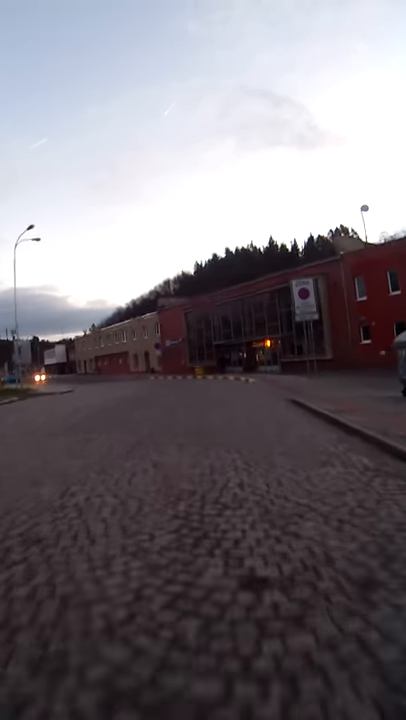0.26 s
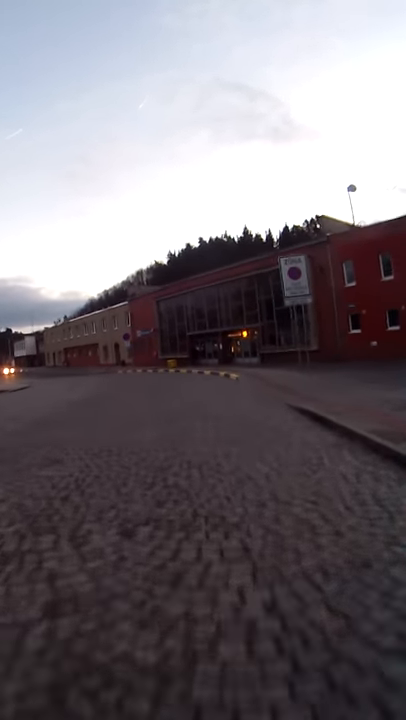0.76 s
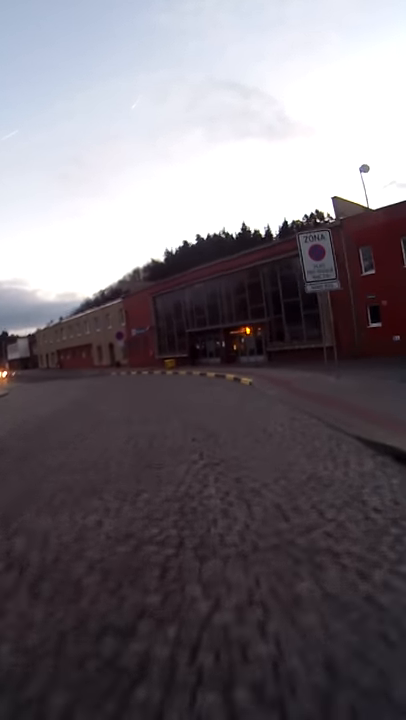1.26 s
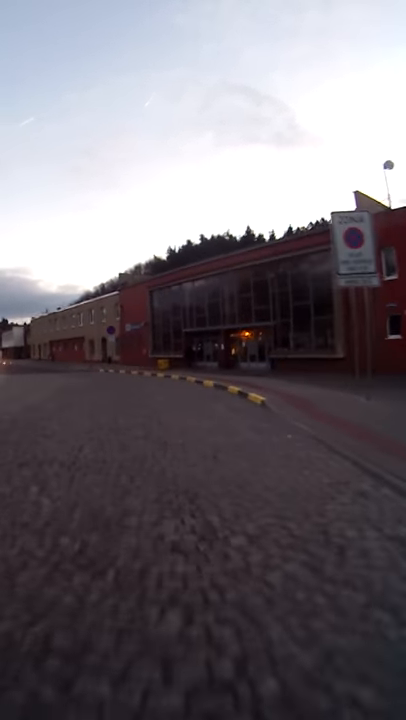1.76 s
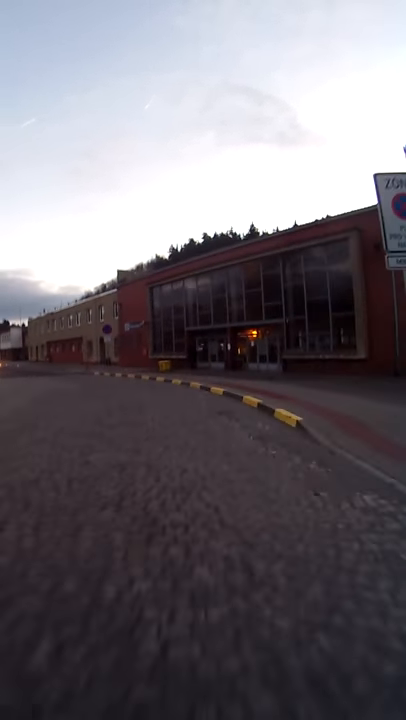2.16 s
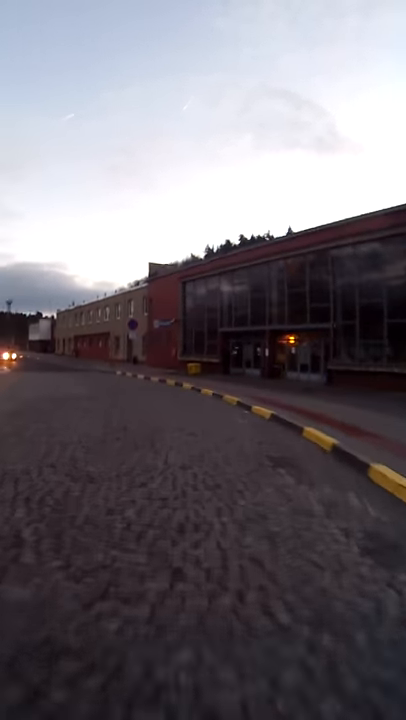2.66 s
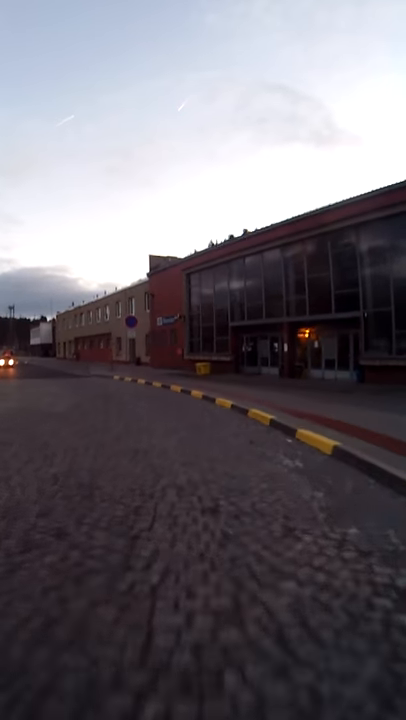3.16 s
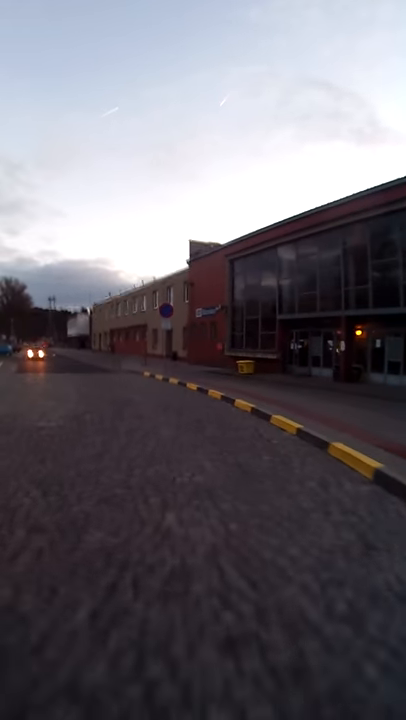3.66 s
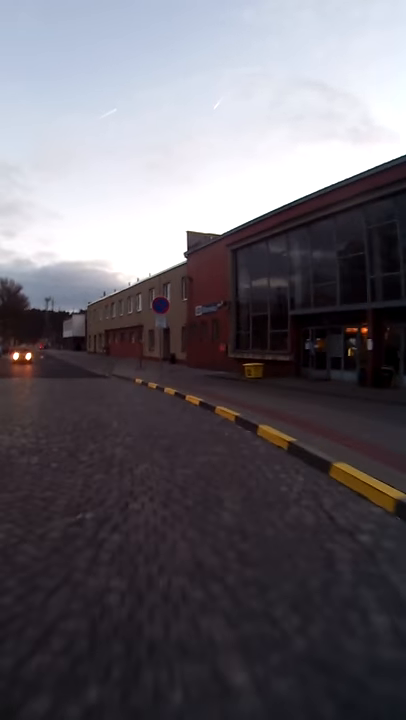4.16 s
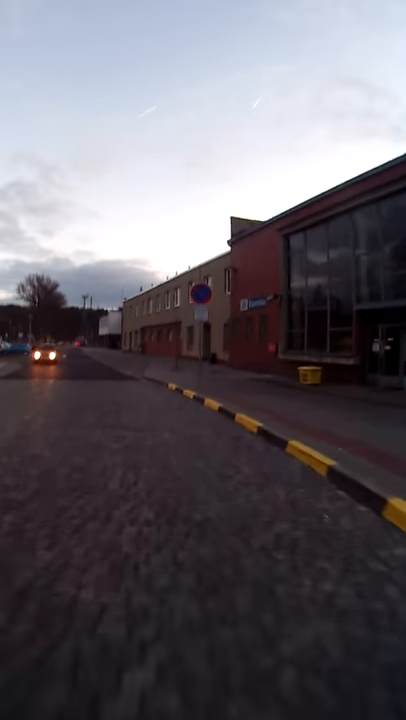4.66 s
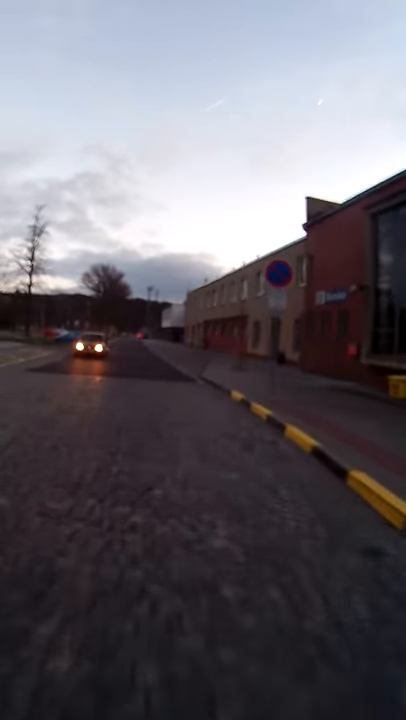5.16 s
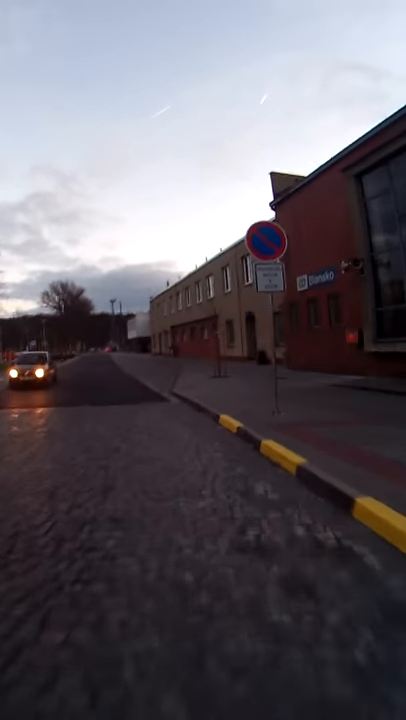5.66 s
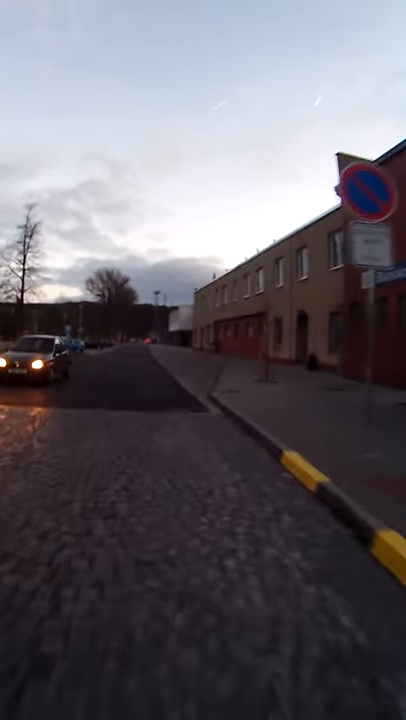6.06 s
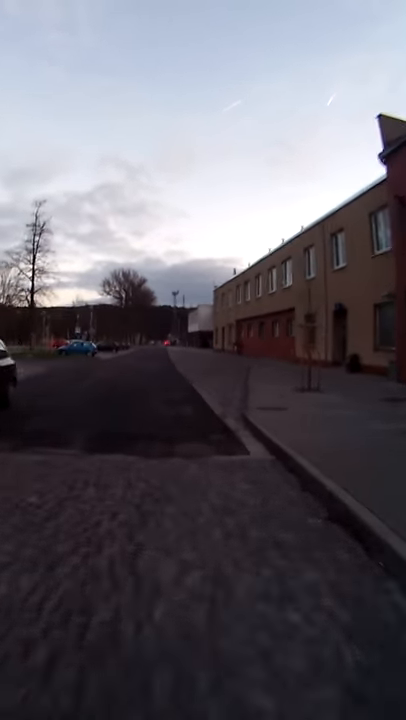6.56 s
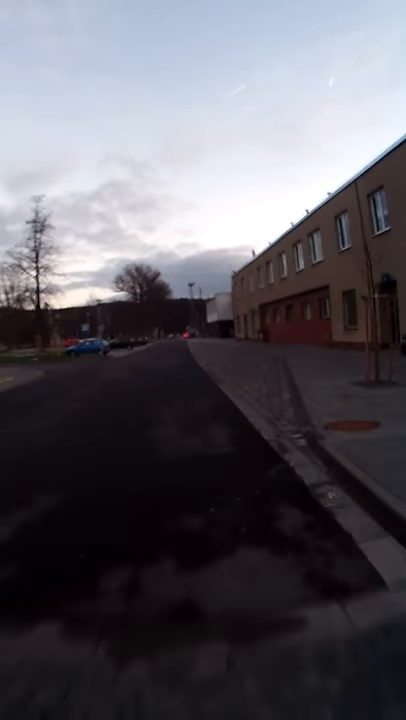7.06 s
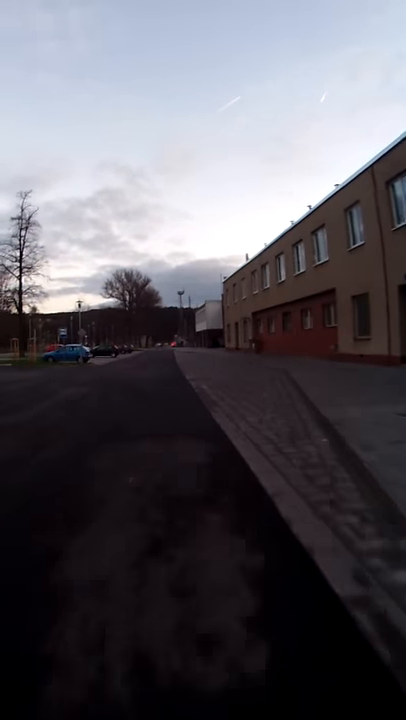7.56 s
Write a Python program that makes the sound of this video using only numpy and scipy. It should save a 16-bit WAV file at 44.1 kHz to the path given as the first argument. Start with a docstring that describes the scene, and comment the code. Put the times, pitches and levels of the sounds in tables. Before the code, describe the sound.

Close, mono, bike-mounted sound: fast uneven stone impacts merge into a low, shuddering drone with muffled treble. Grit crackles softly under the tyres. Isolated bright clacks from a loose fitting punch through, a few early, then clusters as the ride gets rougher, along with dull distorted knocks. Finally the bicycle rolls onto asphalt, the low thudding eases and the tread hums unsteadily, ending abruptly.

```python
"""Bicycle on cobblestones, then asphalt

A bicycle with a camera fixed to it rolls over cobbles and, in about the last half second, on to asphalt. Stone
impacts ring frame and camera housing; proud stones add big swings that overload the microphone. A loose part
clacks and ticks: short contacts through its modes, with dull knocks at its hardest blows. Grit hiss is noise in
spurts, one per stone; the tread hums, and on asphalt sings an unsteady note built of sine partials."""
import sys
import numpy as np
from scipy import signal
from scipy.fft import rfft, irfft
from scipy.io import wavfile
from scipy.ndimage import uniform_filter1d, minimum_filter1d, map_coordinates

SR = 44100
rng = np.random.default_rng(int(sys.argv[2]) if len(sys.argv) > 2 else 0)


def unload_wav(signal):
    """Save mono or channel-first audio to the path in sys.argv[1] as 16-bit WAV at rate SR, clipped to [-1, 1]."""
    wavfile.write(
        sys.argv[1],
        SR,
        np.round(np.clip(np.atleast_2d(signal).T, -1, 1) * 32767).astype(np.int16),
    )


N = 343891
TOP_HZ = 17100  # upper band limit

# Proud stones. Each row: centre in seconds, swing level before limiting in dB, housing pitch in Hz.
PROUD_STONES = [(0.69, -4, 237), (0.801, -4.5, 320), (1.0405, -3.5, 251), (1.07, -5.5, 238),
                (1.097, -2, 295), (1.118, -4.7, 318), (1.311, -4, 310), (1.835, -8, 259),
                (1.952, -4.6, 286), (1.973, -4, 288), (2.526, -5, 307), (3.145, -5, 306), (3.729, -5, 300),
                (3.806, -5, 312), (4.107, -6, 275), (4.525, -5.5, 305), (4.667, -3.5, 292),
                (4.977, -3.5, 297), (5.0203, -8, 305), (5.157, -3.5, 304), (5.224, -8, 292.5),
                (5.308, -10, 280), (5.397, -2.5, 315), (5.471, -4.2, 295), (5.69, -3.5, 282),
                (5.784, -2, 296), (6.002, -1, 279), (6.066, -4.5, 272), (6.132, -4.5, 301),
                (6.299, -4, 295), (6.426, -3, 282), (6.656, -1.5, 271), (6.72, -4, 299), (7.018, -4.5, 235),
                (7.048, -3, 255), (7.06, -4.4, 267)]
# Blows of the loose part. Each row: time in seconds, level before the scene's clack gain in dB,
# upper edge in Hz, tilt in dB per octave.
LOOSE_BLOWS = [(0.319, -27, 3500, -6), (0.339, -28, 3800, -4.5), (0.3468, -17.5, 4560, -3),
               (1.04, -23.5, 3000, -13), (1.209, -28, 3400, 4), (1.314, -21, 3000, 1),
               (1.834, -22, 3400, -12), (1.898, -18, 4600, -3.5), (1.928, -22.5, 4000, -7),
               (2.167, -27, 3470, -4), (2.326, -22.5, 4460, -2), (2.4009, -11, 9700, -0.5),
               (2.415, -14, 6800, -1), (2.4572, -13.5, 4360, 0.5), (2.474, -13, 4880, -1.5),
               (2.9935, -8.5, 10300, -0.5), (3.035, -22, 3840, -3), (3.2585, -24.5, 3400, 7),
               (3.698, -28, 3800, 5), (3.9002, -22, 3500, 2.5), (4.1177, -19.5, 3440, 2),
               (4.218, -26.5, 3200, 1.5), (4.374, -24, 3500, -2), (4.5576, -12.5, 6550, .5),
               (4.57, -19.5, 6600, -0.5), (4.5848, -14.5, 6640, -2), (4.615, -21, 4350, -3),
               (4.754, -20, 3500, -1), (4.979, -26, 4800, 0), (4.993, -14, 6500, 2), (5.007, -22, 6400, 1),
               (5.0219, -10.5, 16000, 1.5), (5.036, -20, 5800, -3), (5.0775, -16, 6100, 0),
               (5.091, -18, 5970, -2), (5.118, -24, 3900, 2), (5.137, -17.5, 4480, -0.5),
               (5.225, -8.5, 16000, -0.5), (5.239, -29, 7500, 1), (5.3105, -10, 14470, 0),
               (5.4276, -14, 4970, -0.5), (5.615, -25.5, 3850, 1.5), (5.787, -12, 4000, -5.5),
               (5.797, -24.5, 4370, -4), (5.842, -16.5, 4630, -7), (6.0086, -13.5, 7640, 0.5),
               (6.024, -10, 7800, 0.5), (6.034, -28.5, 7800, 5), (6.108, -17, 3000, -6),
               (6.225, -23, 4400, -8), (6.243, -24, 3900, -2), (6.302, -24, 3370, -7),
               (6.367, -24, 3800, -7), (6.426, -6.5, 12000, 0.5), (6.4418, -5, 14000, 0),
               (6.678, -15, 4600, -3.5), (6.801, -23, 4300, -4), (7.028, -22, 3400, -6),
               (7.095, -28, 3500, 0)]
# Modes of the loose part. Each row: centre in Hz, width in Hz, level in dB.
LOOSE_MODES = [(850, 260, -6.5), (1190, 1300, -4.5), (1675, 260, 7), (1973, 440, 4), (2550, 340, 2.5),
               (3084, 550, 2.5), (3640, 500, -8.5), (4260, 1100, -5), (6100, 4800, -19.5),
               (8060, 4900, -34), (12900, 19000, -32.5)]
# Grit on the road. Each row: time in seconds, base level of the tyre hiss in dB.
ROAD_GRIT = [(0, -45), (0.1, -56.5), (0.33, -49.5), (0.55, -52.5), (0.7, -53), (0.85, -51.5), (1.08, -52.5),
             (1.25, -49.5), (1.44, -53.5), (1.62, -51), (1.9, -51), (2.2, -48.5), (2.45, -49), (2.55, -53),
             (2.75, -51.5), (2.93, -51.5), (3.1, -49), (3.45, -47), (3.6, -51), (3.8, -47), (4, -49.5),
             (4.15, -48.5), (4.45, -50.0), (4.75, -49), (4.86, -53), (4.93, -49), (5.05, -50), (5.2, -51),
             (5.35, -49), (5.55, -51.5), (5.8, -48), (6.15, -48), (6.4, -47.5), (6.55, -48.5), (6.8, -47.5),
             (7.1, -49), (7.4, -51), (7.8, -54)]
# Brief lulls in the road noise. Each row: centre in seconds, level change in dB, scaled at each use.
ROAD_LULLS = [(.265, -6.5), (.88, -1), (1.165, -5), (1.79, -5), (3.43, -8), (3.97, -3.5), (4.78, -1.5),
              (5.2, -0.5), (5.335, -5), (6.495, -6.5), (6.93, -2.5)]
LULL_S = 0.021


def amp(db):
    """Amplitude ratio of a level in dB."""
    return 10 ** (np.asarray(db) / 20)


def unit(x):
    """x scaled to rms 1."""
    return x / np.sqrt(np.mean(x ** 2) + 1e-20)


def curves(rows):
    """One value per sample for each column after the time."""
    s, *cols = np.transpose(rows)
    return [np.interp(np.arange(N) / SR, s, c) for c in cols]


def wobble(rate):
    """A smooth random curve, rate knots a second."""
    knots = rng.standard_normal(int(N * rate / SR) + 4)
    return map_coordinates(knots, [np.arange(N) * rate / SR])


def swells(rows, length_s):
    """Sum of bell-shaped swells, one for each (centre s, height) row."""
    t = np.arange(0, N, 32) / SR  # coarse grid, interpolated below
    bells = sum(height * np.exp(-np.minimum(((t - s) / length_s) ** 2, 30)) for s, height in rows)
    return np.interp(np.arange(N) / SR, t, bells)


def held(x, span_s):
    """x held near rms 1 over every span."""
    size = max(int(span_s * SR), 8)
    power = uniform_filter1d(uniform_filter1d(x ** 2, size), size)
    return x / np.sqrt(np.abs(power) + 1e-12)


def ring(modes, size=16384):
    """Minimum-phase impulse response of a body with steep-sided resonances."""
    f = np.fft.rfftfreq(size, 1 / SR)
    power = sum(amp(db) ** 2 / (1 + (2 * (f - hz) / width) ** 2) ** 3 for hz, width, db in modes)
    # folding the cepstrum makes the response causal
    cepstrum = irfft(np.log(power + 1e-10) / 2)
    cepstrum[1:size // 2] *= 2
    cepstrum[size // 2 + 1:] = 0
    return irfft(np.exp(rfft(cepstrum)))[:size // 2]


def through(force, response):
    """Force convolved with a body's response."""
    return signal.fftconvolve(force, response)[:N]


def muffled(x, edge_hz):
    """x with little left above the edge."""
    lowpass = signal.butter(10, min(edge_hz, TOP_HZ), fs=SR, output="sos")
    return signal.sosfilt(lowpass, x)


def flatten(x, top, size):
    """Crests above top rounded off by a gain dip smoothed over size samples, twice."""
    gain = minimum_filter1d(top / np.maximum(np.abs(x), top), size)
    return x * uniform_filter1d(uniform_filter1d(gain, size), size)


def blow_train(rate, scatter, spread_db):
    """Impulses before scaling, about rate a second, uneven in spacing (share of a gap) and size."""
    chance = rng.standard_normal((int(rate * N / SR) + 1, 2))
    place = (np.arange(len(chance)) + scatter * chance[:, 0]) / rate
    at = (place * SR).astype(int) % N
    return np.bincount(at, amp(spread_db * chance[:, 1]), N)


def blows(rate, scatter, spread_db):
    """Blow train without offset, at rms 1."""
    force = blow_train(rate, scatter, spread_db)
    return unit(force - force.mean())


def asphalt():
    """0 on the cobbles, 1 on the asphalt."""
    reach_s, crossing_s = 7.21, 0.13
    return np.clip((np.arange(N) / SR - reach_s) / crossing_s, 0, 1)


def noise_floor():
    """A very faint steady white noise floor."""
    return amp(-97) * rng.standard_normal(N)


def patter():
    """Grit level, rms 1: a short spurt on every stone over a steady bed, only the bed on asphalt."""
    decay_s, rise_s, bed_db = 0.008, 0.0004, -8
    hits = blow_train(rate=32, scatter=0.35, spread_db=3.1) * (1 - asphalt())
    t = np.arange(SR // 20) / SR
    spurt = np.exp(-t / decay_s) * (1 - np.exp(-t / rise_s))
    return unit(amp(bed_db) + through(hits, spurt))


def tyres():
    """Noise forces: tread hum, thin housing shell kept ringing, and grit hissing in spurts."""
    # Resonances of tread, housing shell, coarse grit and fine bright grit.
    # Each row: centre in Hz, width in Hz, level in dB.
    tread_modes = [(497.9, 17, -3), (514.8, 81, -9.5)]
    shell_modes = [(720, 300, -7), (1020, 280, -8.5), (1348, 310, -4.5), (1619, 220, -2.5), (1695, 73, 0.5),
                   (2290, 900, -13.5)]
    grit_bands = [(1366, 580, -7.5), (1910, 410, -1.5), (2402, 680, -0.5), (2970, 320, -11)]
    sizzle_bands = [(2980, 280, 9.5), (3330, 780, 0), (3800, 400, -18.5)]
    cobble_hum_db, asphalt_hum_db = -42, -36.5
    drift_db, grain_db = 0.9, 2.6
    scuff_db, scuff_s = 1, 0.017

    on_asphalt = asphalt()
    hum_db = cobble_hum_db + (asphalt_hum_db - cobble_hum_db) * on_asphalt + 3 * wobble(10)
    hum = amp(hum_db) * held(through(rng.standard_normal(N), ring(tread_modes)), span_s=0.83)

    # stones that throw the loose part also scuff the tyres harder
    scuff = np.minimum(swells([(s, 1) for s, *_ in LOOSE_BLOWS], scuff_s), 1)
    grit_db, = curves(ROAD_GRIT)
    hiss_db = grit_db + drift_db * wobble(14) + 0.9 * swells(ROAD_LULLS, LULL_S) + scuff_db * scuff
    excess_db = hiss_db - hiss_db.mean()

    spurts = patter()
    shell_db = -46.5 + 0.52 * excess_db + 1.8 * wobble(20)
    shell_force = spurts ** 0.36 * rng.standard_normal(N)
    shell = amp(shell_db) * unit(through(shell_force, ring(shell_modes)))

    grit = rng.standard_normal((2, N)) * spurts * amp(grain_db * wobble(400))
    coarse = amp(hiss_db + 0.84) * unit(through(grit[0], ring(grit_bands)))
    # the harder the grit is crushed, the brighter it gets
    fine_db = hiss_db + 2.8 * excess_db - 12.0 - 2 * on_asphalt
    fine = amp(fine_db) * unit(through(grit[1], ring(sizzle_bands)))
    return hum + muffled(shell + coarse + fine, edge_hz=3800)


def singing():
    """On the smooth asphalt the tread sings a slightly unsteady note of sine partials."""
    # Each row: time in seconds, base pitch in Hz, level in dB.
    note_rows = [(7.22, 164, -0.5), (7.3, 165.4, -2.5), (7.4, 169.3, 3), (7.5, 165.7, -4.5),
                 (7.56, 165.9, 0), (7.62, 166.8, 6), (7.68, 171.7, 0), (7.8, 168.6, -3.5)]
    # Each row: multiple of the base pitch, level in dB.
    partials = [(2, -23.5), (3, -36.5)]
    hz, level_db = curves(note_rows)
    phase = 2 * np.pi * np.cumsum(hz * (1 + 0.003 * wobble(30))) / SR
    note = np.zeros(N)
    for multiple, db in partials:
        level = np.sqrt(2) * amp(level_db + db + 1.3 * wobble(18))
        note += level * np.sin(round(multiple) * phase)
    return asphalt() * note


def ticks():
    """The loose part chatters lightly on the cobbles: impulses through its modes, following the hiss."""
    grit_db, = curves(ROAD_GRIT)
    force = blows(rate=24, scatter=0.45, spread_db=4) * (1 - asphalt())
    chatter = unit(muffled(through(force, ring(LOOSE_MODES)), edge_hz=3000))
    return amp(grit_db - 4.5) * chatter


def dull_knocks():
    """Dull knocks as the loose part lands hard: short bursts through low bands."""
    # Each row: start in seconds, peak in dB.
    knock_rows = [(1.834, -29), (4.106, -23.5), (4.9915, -23), (5.02, -17), (5.223, -18), (5.308, -17.5),
                  (5.785, -23), (6.001, -21.5), (6.007, -22), (6.022, -17.5), (6.439, -22)]
    # Each row: centre in Hz, width in Hz, level in dB.
    knock_bands = [(790, 330, 0.5), (1240, 490, -2.5), (1680, 430, -6.5)]
    response = ring(knock_bands, size=4096)
    at = [round(s * SR) for s, db in knock_rows]
    bursts = np.bincount(at, [amp(db) for s, db in knock_rows], N)
    return through(bursts, response / np.abs(response).max())


def travelled(force, tilt_db):
    """A blow, tilted by dB per octave, after bending along the frame: the treble arrives first."""
    travel_s = 0.0026  # bending delay at 1 kHz, before a common advance of .62 of it
    khz = np.fft.rfftfreq(len(force), 1 / SR) / 1000
    lag = 2000 * np.pi * travel_s * (2 * np.sqrt(khz) - 0.62 * khz)
    tilt = amp(tilt_db * np.log2(np.maximum(khz, 0.5) / 2))
    return irfft(rfft(force) * tilt * np.exp(-1j * lag), len(force))


def clacks(lead_in_db=-24, lead_in_s=0.0019, chatter_db=-33, chatter_t60_s=0.041):
    """A brief noisy swell leads into the hit of the loose part, which chatters out through its modes."""
    looseness, firm_db = 0.9, -17  # extra chatter in dB per dB below a firm blow
    vary_db = 1.5
    t = np.arange(-SR // 100, SR // 20) / SR
    lead_in = amp(lead_in_db) * np.exp(-np.abs(t) / lead_in_s) * (t < 0)
    chatter = amp(chatter_db - 60 * np.abs(t) / chatter_t60_s) * (t > 0)
    out = np.zeros(N + SR)
    for s, db, edge_hz, tilt_db in LOOSE_BLOWS:
        # a light contact does not seat the part, so it rattles on
        loose = amp(looseness * np.clip(firm_db - db, 0, 10))
        rattle = rng.standard_normal(len(t)) * (lead_in + loose * chatter)
        contact = ((t == 0) + rattle) / np.sqrt(loose)
        force = muffled(travelled(contact, tilt_db), edge_hz)
        # each blow lands on another spot and shares its energy differently among the modes
        modes = [(hz, width, level + vary_db * rng.standard_normal()) for hz, width, level in LOOSE_MODES]
        response = ring(modes, size=4096)
        clack = signal.fftconvolve(force, response / np.linalg.norm(response))
        out[round((s + t[0]) * SR):][:len(clack)] += amp(db) * clack
    return out[:N]


def road(stone_rate, grit_db):
    """Force on the bicycle: both wheels meet stone after stone, plus noise for their gritty faces."""
    wheels = sum(blows(stone_rate, scatter=0.3, spread_db=0.5) for _ in range(2))
    return unit(wheels) + amp(grit_db) * rng.standard_normal(N)


def flexed(x):
    """x with its pitch wandering on the cobbles as the camera mount flexes."""
    bend = 0.016 * (1 - asphalt()) * wobble(14)  # share of the pitch
    return map_coordinates(x, [np.arange(N) + np.cumsum(bend)], mode="mirror")


def ring_ups():
    """Stones in step with one resonance ring it up clean: sine swells, and their progress 0 to 1."""
    # Each row: centre in seconds, pitch in Hz, level in dB.
    tone_rows = [(.35, 112, -16), (.42, 323, -13), (.69, 223.5, -12), (.83, 313, -16), (1.05, 224, -10),
                 (1.125, 334.3, -14.5), (1.68, 318, -13.5), (1.851, 106, -13), (1.965, 297, -11.5),
                 (2.96, 308, -11), (4.099, 104, -11.5), (4.66, 324.5, -14.5), (5.17, 333.2, -14),
                 (5.77, 109.5, -11), (6.01, 224.5, -10), (6.655, 222.5, -12), (6.73, 110, -8.5),
                 (7.034, 223.6, -9.5), (7.23, 102.4, -16), (7.3, 104.8, -19), (7.52, 225.5, -15.5)]
    swell_s = 0.042
    t = np.arange(N) / SR
    tones = np.zeros(N)
    for s, hz, db in tone_rows:
        tone = np.cos(2 * np.pi * hz * (t - s) + rng.uniform(0, 2 * np.pi))
        tones += amp(db) * swells([(s, 1)], swell_s) * tone
    return tones, np.minimum(swells([(s, 1) for s, hz, db in tone_rows], swell_s), 1)


def jolts(motion, length_s, frame_hz, frame_share):
    """Proud stones swing frame and housing briefly; also the share of the motion they replace."""
    t = np.arange(-SR // 12, SR // 12) / SR
    swings, share = np.zeros((2, N + SR))
    swell = np.exp(-(t / length_s) ** 2)
    frame = frame_share * np.cos(2 * np.pi * frame_hz * t)
    for s, db, hz in PROUD_STONES:
        start = round((s + t[0]) * SR)
        swing = (1 - frame_share) * np.cos(2 * np.pi * hz * t) + frame
        direction = np.sign(motion[round(s * SR)])
        swings[start:][:len(t)] += direction * amp(db) * swell * swing
        share[start:][:len(t)] += swell
    return swings[:N], np.clip(share[:N], 0, 1)


def rumble():
    """Road force rings the frame low down and the housing above it; tyres cushion all but proud stones."""
    # Roughness of the paving. Each row: time in seconds, base frame thud in dB.
    paving_rows = [(0, -22.5), (1.7, -21.5), (3.3, -23), (5.2, -20.5), (6.7, -19.5), (7.32, -22),
                   (7.55, -30), (7.8, -33)]
    # Shaking of the housing. Each row: time in seconds, base deep boom in dB, base upper boom in dB.
    shaking_rows = [(0.0, -23, -19), (0.2, -18, -19), (0.4, -19.5, -16), (0.6, -18, -17.5),
                    (0.8, -18, -17.5), (1.0, -21, -21.5), (1.2, -21, -16.5), (1.4, -19, -20.5),
                    (1.6, -20.5, -16.5), (1.8, -21.5, -19.5), (2.0, -16, -15.5), (2.2, -24.5, -19),
                    (2.4, -20.5, -18), (2.6, -19, -20.5), (2.8, -23.5, -17.5), (3.0, -23, -17),
                    (3.2, -20.5, -20.5), (3.4, -21, -19), (3.6, -22, -19.5), (3.8, -20, -19.5),
                    (4.0, -24, -20.5), (4.2, -19, -18), (4.4, -20.5, -18.5), (4.6, -19.5, -17),
                    (4.8, -21.5, -19.5), (5.0, -21, -18), (5.2, -16, -21), (5.4, -19, -18.5),
                    (5.6, -23, -19), (5.8, -18.5, -21), (6.0, -20.5, -18), (6.2, -22, -19),
                    (6.4, -22.5, -20.5), (6.6, -20, -17.5), (6.8, -20, -18.5), (7.0, -20, -21),
                    (7.2, -20.5, -17), (7.4, -22.5, -17.5), (7.6, -20.5, -20), (7.8, -21, -22)]
    # Dips that thump the frame. Each row: centre in seconds, thud change in dB.
    thump_rows = [(.35, 8), (3.04, 10), (4.1, 7), (5.02, 9.5), (5.9, -1), (6.72, 6), (6.99, 7), (7.31, 7)]
    # Resonances of frame, deep housing and upper housing.
    # Each row: centre in Hz, width in Hz, level in dB.
    frame_modes = [(26, 16, -21.5), (52, 36, -15.5), (69.5, 12, -11), (96.8, 40, -4.5), (113.7, 26, 1),
                   (136, 63, -9.5)]
    deep_modes = [(189.6, 37, -7.5), (225.3, 28, 1), (250, 28, -10.5)]
    upper_modes = [(295, 68, -6), (321.9, 42, -1.5), (352.9, 87.5, -8), (585.7, 140, -29)]
    thump_s = 0.015
    rock_rate, thud_rock_db, boom_rock_db = 16, 2.7, 0.6  # rocking from stone to stone, knots a second
    surge_db, surge_s, surge_lag_s = 0.8, 0.04, 0.007  # the housing booms harder around each jolt
    ring_up_share = 0.4  # share of the other motion that a ring-up takes over

    paving_db, = curves(paving_rows)
    deep_db, upper_db = curves(shaking_rows)
    lull_db = swells(ROAD_LULLS, LULL_S)
    surge = np.minimum(swells([(s + surge_lag_s, 1) for s, db, hz in PROUD_STONES], surge_s), 1)
    thud_db = paving_db + swells(thump_rows, thump_s) + lull_db + thud_rock_db * wobble(rock_rate)
    boom_db = surge_db * surge + 1.2 * lull_db + boom_rock_db * wobble(rock_rate)

    force = road(stone_rate=34, grit_db=1.5)
    thud = amp(thud_db) * held(through(force, ring(frame_modes)), span_s=0.053)
    deep = amp(deep_db - 0.24) * held(through(force, ring(deep_modes)), span_s=0.11)
    upper = amp(upper_db + 0.1) * held(flexed(through(force, ring(upper_modes))), span_s=0.066)

    tones, ringing = ring_ups()
    shaken = thud + amp(boom_db) * (deep + upper)
    motion = shaken * (1 - ring_up_share * ringing) + tones
    cushioned = flatten(muffled(motion, edge_hz=2500), top=0.48, size=360)
    swings, share = jolts(cushioned, length_s=0.0073, frame_hz=112, frame_share=0.25)
    return cushioned * (1 - share) + swings


def scene(clack_db=12.0):
    """Everything reaches one microphone on the bicycle, over a faint noise floor."""
    background = noise_floor() + tyres() + singing()
    loose_part = ticks() + amp(clack_db) * clacks()
    return (background + loose_part + dull_knocks() + rumble())[None]


def record(dry):
    """The camera flattens loud crests and keeps little above its band limit; the end fades softly."""
    fade_s = 0.008
    limited = flatten(dry, top=0.51, size=7)
    fade = np.sin(np.pi / 2 * np.minimum(np.arange(N)[::-1] / (fade_s * SR), 1)) ** 2
    return muffled(limited * fade, TOP_HZ)


dry = scene()
out = record(dry)
unload_wav(out)
```